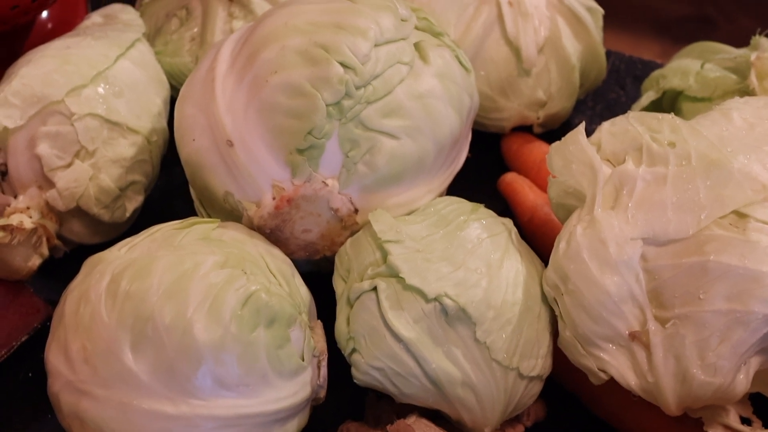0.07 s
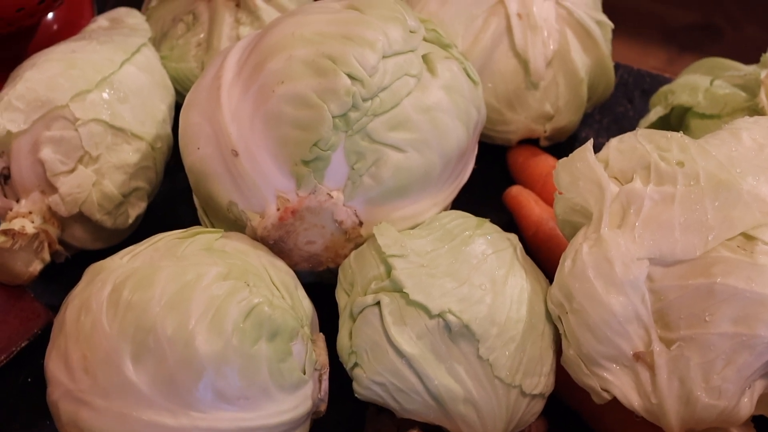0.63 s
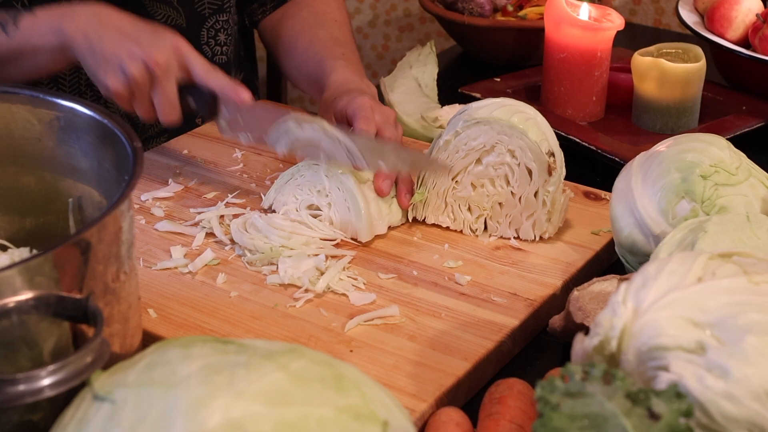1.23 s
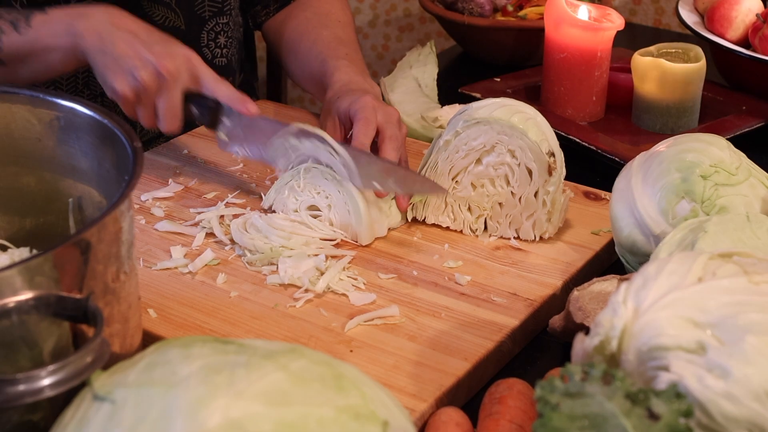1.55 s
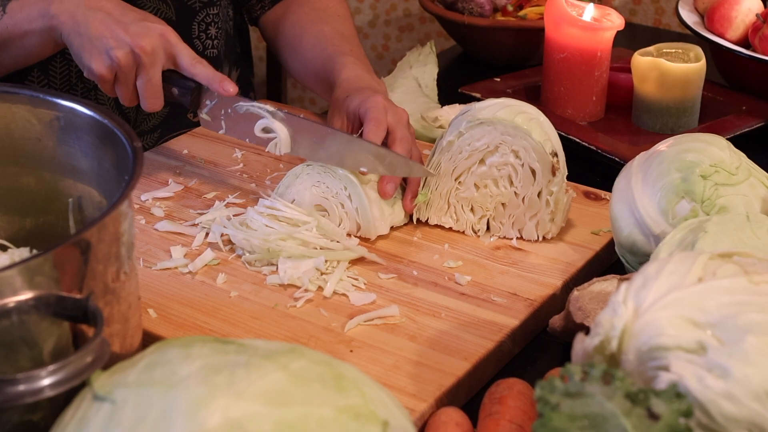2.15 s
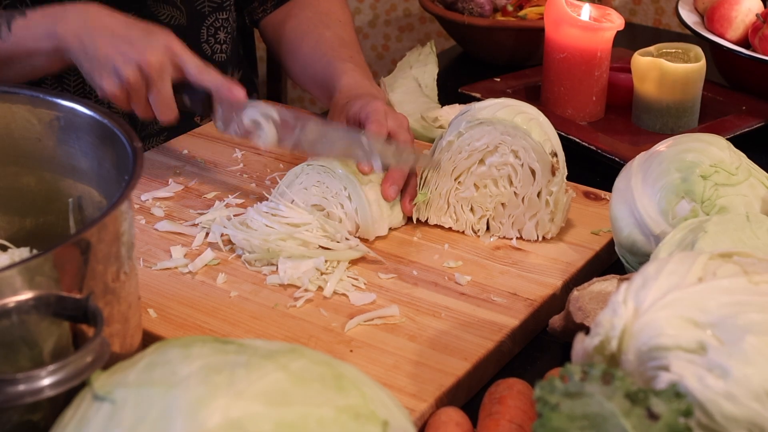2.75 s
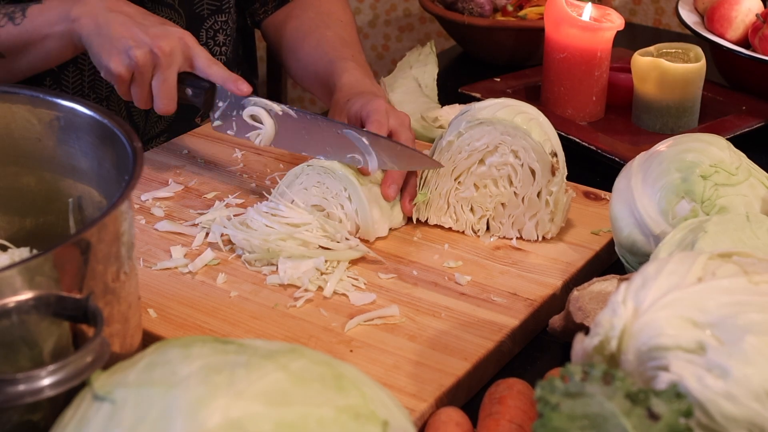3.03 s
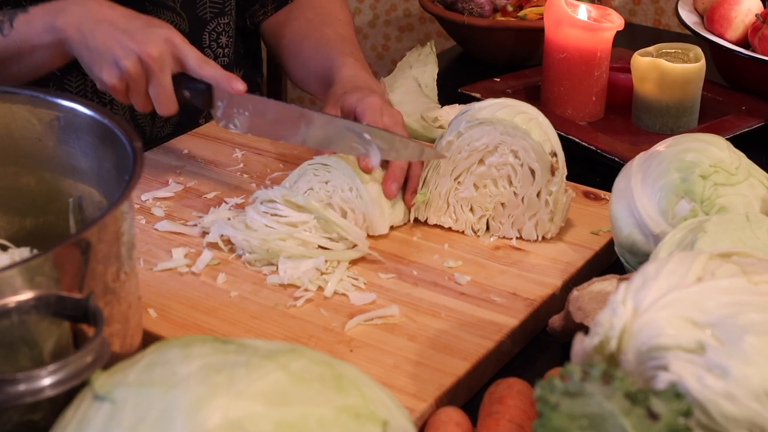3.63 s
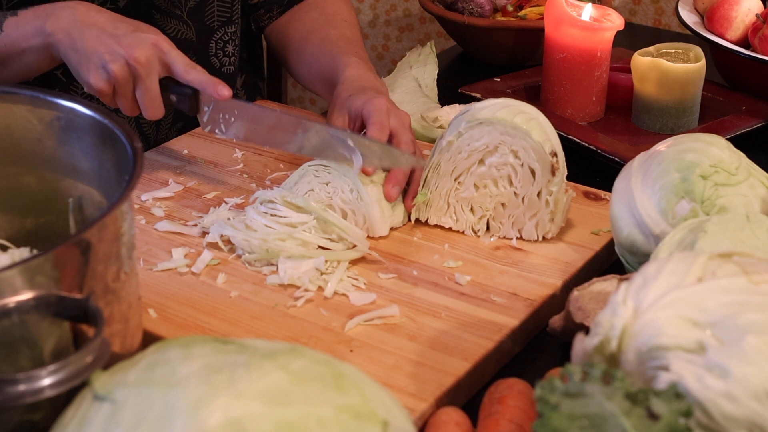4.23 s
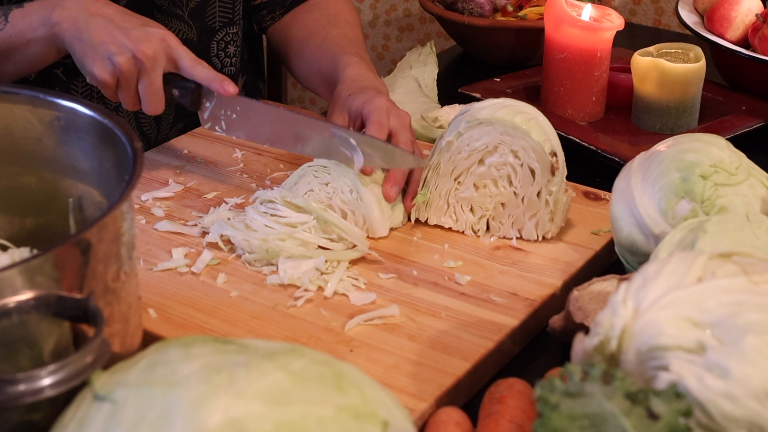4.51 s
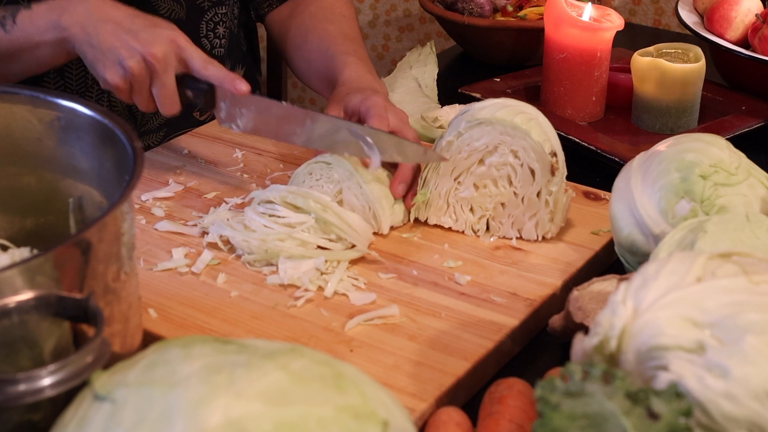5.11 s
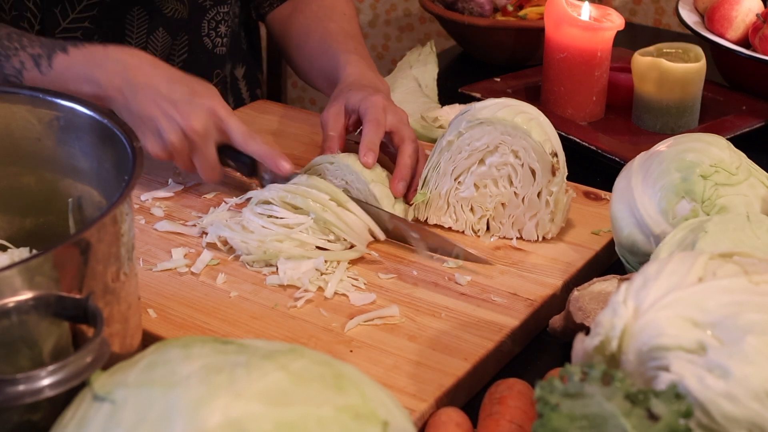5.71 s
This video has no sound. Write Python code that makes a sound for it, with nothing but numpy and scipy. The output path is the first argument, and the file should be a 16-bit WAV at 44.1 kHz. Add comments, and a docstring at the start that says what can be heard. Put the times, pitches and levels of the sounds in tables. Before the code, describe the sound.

Cabbage crunches under a kitchen knife again and again, the blade knocking on a wooden board, with light taps and scrapes between cuts.

```python
"""A small kitchen: a large knife shreds a cabbage on a wooden board, in seven strokes.
Each stroke crunches through the leaves as thousands of tiny breaks. Then the edge knocks on
the board and makes it ring, and on three strokes it also skids along the wood. Between strokes
the blade taps the cabbage, leaves snap or brush the steel, and shreds drop.
A faint hiss and a low hum lie underneath."""
import sys
import numpy as np
from scipy import signal
from scipy.fft import rfft, irfft, next_fast_len
from scipy.io import wavfile

SR = 44100
rng = np.random.default_rng(int(sys.argv[2]) if len(sys.argv) > 2 else 0)


def to_wav(s):
    """Save 16-bit WAV."""
    ch = np.atleast_2d(s).T  # columns
    pcm = np.round(np.clip(ch, -1, 1) * 32767)  # PCM
    wavfile.write(sys.argv[1], SR, pcm.astype(np.int16))


N = 258426
TIME = np.arange(N) / SR

# Levels in dB are relative. A "t60" is the time in seconds a sound takes to fade by 60 dB.
# the edge landing on the board: start_s, blow_db, crack_db, brightness_hz, ring_length (1 = undamped)
KNOCKS = [(1.0078, -6.5, -2, 4010, 0.087), (1.7335, 2, 4, 5030, 0.96), (2.4804, -6.5, -14, 2390, 0.92),
          (3.3027, 2, 4, 5130, 1), (3.8682, 0.5, 0.5, 1120, 0.79), (4.7502, 2, 4, 5060, 0.89),
          (5.5897, 1.5, -0.5, 4980, 0.77)]
# the tone that the blade gives to leaves touching it: pitch_hz, level_db
BLADE = [(1400, 0.5), (2000, 6), (2800, 4.5), (3400, -3.5), (3700, 3.5), (4200, -16), (4800, -4),
         (5600, -3.5), (6500, 6), (7400, -10), (8700, 0.5), (10500, -11.5), (13000, 0), (16000, 7)]


def from_db(db):
    """Turn decibels into a gain to multiply by."""
    return 10 ** (np.asarray(db) / 20)


def unit_level(x):
    """Scale a sound so that its average (rms) level is 1."""
    return x / np.sqrt(np.mean(x ** 2) + 1e-20)


def at_hz(points, hz):
    """Read between the rows of a table, with octaves evenly spaced."""
    points = np.array(points)
    return np.interp(np.log(np.maximum(hz, 1)), np.log(points[:, 0]), points[:, 1])


def colour(x, tone):
    """Make each pitch louder or softer, following a table of pitch_hz, level_db."""
    size = next_fast_len(len(x))
    hz = np.arange(size // 2 + 1) * SR / size
    return irfft(rfft(x, size) * from_db(at_hz(tone, hz)), size)[:len(x)]


def noise(tone, length=N):
    """Steady noise with the given tone, at level 1."""
    return unit_level(colour(rng.standard_normal(length), tone))


def band(x, low_hz, high_hz, order=2):
    """Keep the part of a sound between two pitches."""
    edges = np.clip([low_hz, max(high_hz, low_hz + 20)], [10, 20], [.44 * SR, .45 * SR])
    return signal.sosfilt(signal.butter(order, edges, "band", fs=SR, output="sos"), x)


def keep_side(x, side, hz, order=2):
    """Keep what lies on the "low" or the "high" side of a pitch."""
    return signal.sosfilt(signal.butter(order, hz, side, fs=SR, output="sos"), x)


def around(hz, octaves):
    """The low and high edges of a band around a pitch."""
    return hz / 2 ** (octaves / 2), hz * 2 ** (octaves / 2)


def fade(t, t60):
    """A gain that jumps to 1 at t = 0 and then dies away."""
    return np.exp(-np.log(1000) * np.maximum(t, 0) / max(t60, 1e-4)) * (t >= 0)


def ring(t, hz, t60):
    """One fading note of a struck object."""
    return np.sin(2 * np.pi * hz * t) * fade(t, t60)


def add(track, start_s, sound):
    """Mix a sound into a track at the given time."""
    start = max(round(start_s * SR), 0)
    track[start:start + len(sound)] += sound[:N - start]


def excite(x, response):
    """Every instant of a sound sets off its own copy of a ring or an echo."""
    return signal.fftconvolve(x, response / np.linalg.norm(response))[:N]


def unevenness(rate_hz, depth_db):
    """A gain that wanders at random."""
    wander = keep_side(rng.standard_normal(N), "low", rate_hz)
    return from_db(depth_db * unit_level(wander))


def bursts(tone, strength, per_s, spread_db):
    """A stream of tiny breaks or slips, each a click of random size; overall level 1."""
    happens = rng.random(N) < per_s / SR
    sizes = from_db(spread_db * np.minimum(rng.exponential(1, N), 4))
    signs = rng.choice([-1, 1], N)
    return unit_level(colour(happens * sizes * signs * strength, tone))


def touch(edges_hz, t60, rise_s=0.00033, tone=None):
    """A light contact: a short puff of noise in one band, with a peak of 1."""
    t = TIME[:SR // 3]
    hiss = rng.standard_normal(len(t))
    hiss = colour(hiss, tone) if tone else hiss
    sound = band(hiss, *edges_hz, order=3) * fade(t, t60) * (1 - np.exp(-t / rise_s))
    return sound / np.abs(sound).max()


def movement(t, start_s, end_s, entry_t60, release_t60):
    """The gain of one blade movement: it swells in, holds, then dies away."""
    early = np.maximum(start_s - t, 0) / entry_t60
    late = np.maximum(t - end_s, 0) / release_t60
    return from_db(-60 * np.minimum(early + late, 3))


def slide(start_s, length_s, db, fall_db_per_s, release_t60):
    """The gain of a sliding blade: loudest as it catches, weaker as it slows."""
    slowing = from_db(db - fall_db_per_s * np.clip(TIME - start_s, 0, length_s))
    return slowing * movement(TIME, start_s, start_s + length_s, 0.03, release_t60)


def background(hum_from_s=0.75, fade_in_s=0.04):
    """A faint airy hiss plays until 0.75 s; then the background changes to a low hum over a fainter hiss."""
    # the tones of the hiss and of the hum: pitch_hz, level_db
    air_tone = [(60, -30.5), (140, -13), (280, -3.5), (380, -13), (480, -0.5), (700, -5), (1200, -8),
                (1750, -4), (2300, -14.5), (2900, -22), (3400, -14), (4400, -21.5), (9000, -24),
                (16000, -39.5)]
    hum_tone = [(30, -20), (65, -18), (92, 7.5), (125, -8), (190, -7), (253, 7), (310, -7.5), (480, -5),
                (800, -8.5), (1080, -3), (1800, -19), (2600, -24), (7000, -27), (15000, -45.5)]
    opening = from_db(-64 - 5.5 * TIME) * (TIME < hum_from_s)
    kitchen = np.clip((TIME - hum_from_s) / fade_in_s, 0, 1)
    air = noise(air_tone) * (opening + from_db(-72) * kitchen)
    hum = noise(hum_tone) * from_db(-64) * kitchen
    return air + hum


def room(x, echo_db, first_s=0.0006, late_s=0.12):
    """Echoes from nearby walls: the bass lasts longest, and late echoes thin out quickly."""
    # how fast the early echoes fade: pitch_hz, t60_s
    echo_times = [(150, 0.61), (1000, 0.14), (3000, 0.4), (7000, 0.28), (14000, 0.17)]
    t, edges = TIME[:SR // 2], np.geomspace(80, 18000, 9)
    tail = np.zeros(len(t))
    for low, high in zip(edges, edges[1:]):
        t60 = at_hz(echo_times, np.sqrt(low * high))
        tail += band(rng.standard_normal(len(t)), low, high) * fade(t - first_s, t60)
    tail *= fade(np.maximum(t - late_s, 0), t60=0.083)
    return from_db(echo_db) * excite(x, tail)


def near_echoes(x):
    """Very quick echoes change the tone of a sound while keeping its power."""
    # bounces off hard surfaces near the blade (board, pot, bowl): delay_ms, level_db
    echoes = [(0.9, -24.5), (2.3, -24), (3.7, -14), (5.9, -22)]
    out = x.copy()
    for ms, db in echoes:
        add(out, ms / 1000, from_db(db) * x)
    return out / np.sqrt(1 + sum(from_db(db) ** 2 for ms, db in echoes))


def scattered(x):
    """The same sound, smeared as it arrives from the sides."""
    return excite(x, rng.standard_normal(SR // 8) * fade(TIME[:SR // 8], t60=0.056))


def on_steel(x, ring_db=-5, direct_db=-1):
    """Whatever touches the blade sets it ringing briefly."""
    # the notes of the steel: pitch_hz, level_db, t60_s
    notes = [(1870, -3.5, 0.011), (2376, -6, 0.0067), (3393, -2, 0.045), (4124, -1.5, 0.025),
             (5670, -2, 0.022), (7376, 2, 0.035), (8530, 2.5, 0.0084), (12400, 1, 0.028)]
    ringing = sum(from_db(db) * ring(TIME[:SR // 10], hz, t60) for hz, db, t60 in notes)
    return from_db(direct_db) * x + from_db(ring_db) * excite(x, ringing)


def board(t, vary_db):
    """The board rings after one push; each spot on it favours different notes."""
    # the notes of the undamped board: pitch_hz, level_db, t60_s
    notes = [(135, -22, .3), (185, -17, .22), (210, -15, .28), (253, -6.5, .38), (355, -11, .15),
             (391, -6, .17), (452, -8, .17), (500, -8, .14), (520, -8, .15), (590, -14, .1), (672, -7, .16),
             (712, -8, .14), (796, -5, .15), (869, -8, .16), (1023, -15, .18), (1095, -14, .18),
             (1152, -11, .18), (1206, -12, .18), (1257, -11, .17), (1417, -19, .17), (1480, -19, .17),
             (1862, -19, .15), (1987, -15, .14), (2306, -19, .12)]
    strengths = from_db(vary_db * rng.standard_normal(len(notes)))
    return sum((-1) ** k * strengths[k] * from_db(db) * ring(t, hz, t60)
               for k, (hz, db, t60) in enumerate(notes))


def through_board(x, ring_db=-15, free_s=0.086):
    """Cutting keeps the board faintly ringing; the weight of cabbage and hand soon damps it."""
    t = TIME[:SR // 2]
    damping = fade(np.maximum(t - free_s, 0), t60=0.2)
    return x + from_db(ring_db) * excite(x, board(t, vary_db=0) * damping)


def brushes():
    """Leaves brush the lifted blade with a soft swish."""
    # each swish: start_s, level_db, pitch_hz, t60_s
    swishes = [(0.793, -52.5, 6480, 0.17), (1.371, -54.5, 6250, 0.19), (1.892, -48, 3070, 0.15),
               (2.896, -48.5, 6220, 0.11), (3.744, -45, 9040, 0.2), (5.356, -56, 3880, 0.4)]
    out = np.zeros(N)
    for start_s, db, hz, t60 in swishes:
        add(out, start_s, from_db(db) * touch(around(hz, octaves=1.74), t60, rise_s=0.0069, tone=BLADE))
    return out


def drops(tick_db=-24.5, tick_hz=5550):
    """Shreds fall and the cabbage shifts; returns the dull bumps and their crisp ticks."""
    # each contact: start_s, level_db, pitch_hz
    contacts = [(0.845, -43.5, 450), (3.617, -24, 481), (4.015, -36, 630), (4.085, -49, 700),
                (4.126, -46, 690), (4.201, -38, 720), (4.243, -46.5, 692), (4.282, -42, 760),
                (4.303, -48, 788), (4.323, -38, 667), (4.366, -39.5, 640), (4.389, -34.5, 1130),
                (4.526, -47.5, 660), (4.604, -39, 750), (5.334, -43, 606), (5.786, -34, 470)]
    bumps, ticks = np.zeros(N), np.zeros(N)
    for start_s, db, hz in contacts:
        t60 = 0.065 * 2 ** ((db + 44) / 17)  # heavier contacts ring longer: twice as long per 17 dB
        bump = touch(around(hz, octaves=1.77), t60, rise_s=0.00054)
        tick = touch(around(tick_hz, octaves=1.77), t60=0.0067)
        add(bumps, start_s - .001, from_db(db) * bump)
        add(ticks, start_s, from_db(db + tick_db) * tick)
    return bumps, ticks


def taps():
    """The blade is set against the cabbage: a hollow tap that always leaves the same brief note."""
    # each tap: start_s, level_db, pitch_hz
    contacts = [(2.833, -54, 1030), (2.954, -34.5, 980), (3, -30, 1082), (3.075, -38.5, 985),
                (4.167, -41.5, 860), (4.473, -48, 1040), (5.379, -23, 1060)]
    out = np.zeros(N)
    for start_s, db, hz in contacts:
        tap = touch((0.83 * hz, 1.17 * hz), t60=0.09, rise_s=0.0024)
        note = from_db(-3) * ring(TIME[:len(tap)], hz=1045, t60=0.12)
        add(out, start_s - .001, from_db(db) * (tap + note))
    return out


def snaps():
    """Single leaves snap on the steel: a short crack, then leaf and steel ring on."""
    # each breaking leaf: start_s, level_db, pitch_hz
    breaks = [(2.022, -44.5, 2700), (2.213, -49, 2070), (3.441, -42.5, 2900), (3.557, -37, 4400),
              (3.608, -26.5, 1530), (3.837, -30, 3040), (4.189, -56, 4500), (4.386, -54, 3380),
              (4.674, -20, 3000), (5.0, -39.5, 3040), (5.139, -33.5, 3306), (5.446, -24.5, 6600),
              (5.556, -14.5, 2400)]
    out = np.zeros(N)
    for start_s, db, hz in breaks:
        crack = touch(around(hz, octaves=1.96), t60=0.0067)
        tail = touch(around(hz, octaves=1.1), t60=0.13, tone=BLADE)
        add(out, start_s, from_db(db) * (crack + from_db(-2) * tail))
    return out


def scrape():
    """The flat of the blade rubs the wet cut face with a short, bright zing."""
    # each rub: start_s, length_s, level_db
    rubs = [(3.562, 0.067, -38), (5.148, 0.022, -53.5)]
    # the tone of rubbed steel: pitch_hz, level_db
    steel_tone = [(1500, -51), (2100, 14), (2700, 17), (3500, 11.5), (4200, 24), (5200, 13.5), (6300, 0.5),
                  (7200, -94), (12000, -70)]
    grip = unevenness(rate_hz=55, depth_db=4.0)
    slips = bursts(steel_tone, grip, per_s=5000, spread_db=1.5)
    gain = sum(slide(*rub, fall_db_per_s=195, release_t60=0.18) for rub in rubs)
    return from_db(1.5) * slips * gain


def skid():
    """The edge sticks and slips over the grain of the wood: it judders, rasps and pushes the board."""
    # each skid: start_s, length_s, judder_db, rasp_db, push_db, fall_db_per_s
    skids = [(1.024, 0.18, -19.5, -15.5, -24, 164), (2.472, 0.13, -26.5, -17.5, -22, 164),
             (3.43, 0.071, -47, -41.5, -50, 11.5)]
    # the tones of the low judder and the higher rasp: pitch_hz, level_db
    judder_tone = [(60, -55), (150, -34), (330, -3), (420, -12), (550, -2.5), (750, 2.5), (1100, 1.5),
                   (1550, 1), (2100, 0), (4000, -60), (9000, -45)]
    rasp_tone = [(300, -58), (1000, -21), (1800, 3), (2400, 1.5), (3000, -8), (3500, -5.5), (4100, -8.5),
                 (4900, -20), (7000, -30), (10000, -44), (16000, -54.5)]

    def gain(column, release_t60):
        """The loudness of one layer over all skids."""
        return sum(slide(row[0], row[1], row[column], row[-1], release_t60) for row in skids)

    grain = unevenness(rate_hz=96, depth_db=2.16)
    judder = bursts(judder_tone, grain, per_s=2200, spread_db=0.88) * gain(column=2, release_t60=0.032)
    rasp = bursts(rasp_tone, grain, per_s=2500, spread_db=1.33) * gain(column=3, release_t60=0.1)
    push = board_push(grain, per_s=2200, spread_db=2.5) * gain(column=4, release_t60=0.09)
    return from_db(1.4) * judder + from_db(-6.5) * rasp + from_db(-7) * push


def board_push(strength, per_s, spread_db):
    """Many tiny jolts shake the board into a low rumble."""
    # the tone of the pushed board: pitch_hz, level_db
    push_tone = [(40, -45.5), (95, -28), (135, -0.5), (185, 5.5), (220, 3), (253, 5), (285, -12.5),
                 (450, -27.5), (2000, -77)]
    return bursts(push_tone, strength, per_s, spread_db)


def knocks():
    """The edge cracks on the wood; a millisecond later the whole blade lands and the board rings."""
    # the many close notes of board and table, merged into a woody noise: pitch_hz, level_db
    wood_tone = [(40, -36.5), (90, -33.5), (170, -3), (300, 4.5), (450, -7), (850, 7), (1250, 3.5),
                 (1650, -14), (2100, -2.5), (2800, -18.5), (3400, -15.5), (4500, -30.5), (12000, -50)]
    out, t = np.zeros(N), TIME[:SR // 2]
    landed = t - .0011
    crack = ring(t, hz=2100, t60=0.0041)
    thud = ring(landed, hz=610, t60=0.0039)
    for start_s, blow_db, crack_db, brightness_hz, ring_length in KNOCKS:
        wood = noise(wood_tone, len(t)) * fade(landed, t60=0.31)
        ringing = from_db(-13) * board(landed, vary_db=3.5) + from_db(-19) * wood
        # a blade that stays pressed down damps the ring
        damping = fade(landed, t60=0.42) ** (1 / np.clip(ring_length, .1, 1) - 1)
        blow = from_db(5) * thud + damping * ringing
        knock = from_db(crack_db) * crack + from_db(blow_db) * blow
        add(out, start_s, keep_side(knock, "low", brightness_hz))  # a soft contact sounds duller
    return keep_side(out, "high", hz=190)  # the small board gives off little bass


def stroke_gain(column, release_t60, swell_share=1, sink_s=0.017):
    """One layer's loudness: the edge grazes the outer leaf, sinks in, then swells until it lands."""
    # each cut, with levels at its middle: touch_s, bite_s, crackle_db, tearing_db, push_db, swell_db
    strokes = [(0.921, 0.944, -28.5, -24, -36.5, 3), (1.542, 1.559, -31.5, -26.5, -37, 11),
               (2.404, 2.422, -31.5, -24.5, -38.5, 2), (3.173, 3.216, -24.5, -22.5, -35, 3),
               (3.785, 3.836, -46.5, -32, -68, 3.5), (4.554, 4.597, -31, -27.5, -34.5, 23.5),
               (5.374, 5.464, -26, -24, -31.5, 8.5)]
    gain = np.zeros(N)
    for stroke, knock in zip(strokes, KNOCKS):
        touch_s, bite_s, *_, swell_db = stroke
        land_s = knock[0]
        near = np.abs(TIME - land_s) < .5
        t = TIME[near]
        graze_db = np.interp(t, [touch_s, bite_s], [-8, 0])
        sink_db = np.interp(t, [bite_s - sink_s, bite_s], [-14.5, 0])
        growth_db = swell_share * swell_db * np.interp(t, [bite_s, land_s], [-.5, .5])
        moving = movement(t, touch_s, land_s, entry_t60=0.08, release_t60=release_t60)
        gain[near] += from_db(stroke[column] + graze_db + sink_db + growth_db) * moving
    return gain


def crunch():
    """Cells burst, ribs tear and the cabbage shakes the board as the blade passes leaf after leaf."""
    # the tones of fine crackle and coarse tearing: pitch_hz, level_db
    crackle_tone = [(1500, -2.5), (3000, 3.5), (4500, 1.5), (7000, 1.5), (10000, -4), (13000, -5),
                    (16000, -12.5)]
    tearing_tone = [(100, -21), (200, -12), (400, -6.5), (650, -7), (900, -2.5), (1300, -0.5), (1650, 0),
                    (2100, -0.5), (3000, -4.5), (4200, -9.5), (8000, -26)]
    leaves = unevenness(rate_hz=55, depth_db=1.1)
    crackle = bursts(crackle_tone, leaves, per_s=7000, spread_db=3.2)
    crackle *= stroke_gain(column=2, release_t60=0.045)
    tearing = bursts(tearing_tone, leaves, per_s=3500, spread_db=3.0)
    tearing *= stroke_gain(column=3, release_t60=0.07)
    push = board_push(leaves, per_s=2800, spread_db=2.0)
    push *= stroke_gain(column=4, release_t60=0.08, swell_share=0.66)  # grows less than the leaf noise
    return from_db(-0.76) * crackle + from_db(-3.77) * tearing + from_db(-1.5) * push


def scene():
    """Everything happens at one spot; the bass is centred, the crackle sprays to both sides."""
    # how strongly each pitch spreads sideways: pitch_hz, level_db
    width = [(60, -14), (130, -38), (260, -36.5), (500, -18.5), (1000, -15), (2000, -15.5), (4000, -8),
             (8000, -4), (14000, 1.5)]
    cutting = through_board(near_echoes(crunch() + skid() + scrape()))
    blows = knocks()
    bumps, ticks = drops()
    handling = taps() + bumps + on_steel(snaps() + brushes() + ticks)
    echoes = room(cutting + handling, echo_db=-14.5) + room(blows, echo_db=-15)
    rest = blows + handling + echoes + background()
    middle = cutting + rest
    spray = crunch() + skid() + scrape()  # fresh random clicks make the sound wide
    side = colour(from_db(-3.5) * spray + from_db(2) * scattered(rest), width)
    return np.array([middle + side, middle - side])


def record(dry, low_cut_hz=98, high_cut_hz=16000):
    """Cut the rumble, let the hardest knocks overload, then cut the highest treble."""
    lean = keep_side(dry, "high", low_cut_hz, order=7)
    treble_cut = signal.ellip(10, .1, 70, high_cut_hz, fs=SR, output="sos")
    return signal.sosfilt(treble_cut, np.clip(lean, -1, 1))


dry = scene()
out = record(dry)
to_wav(out)
```